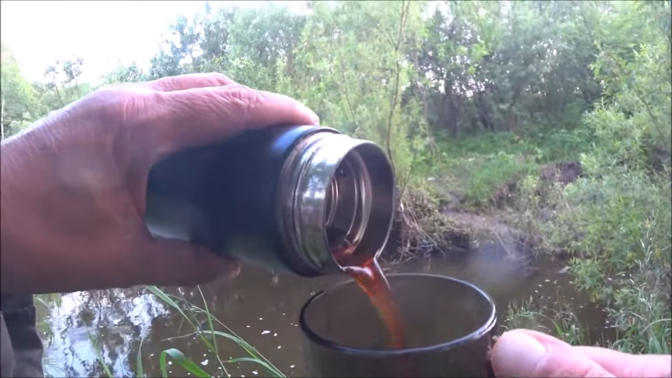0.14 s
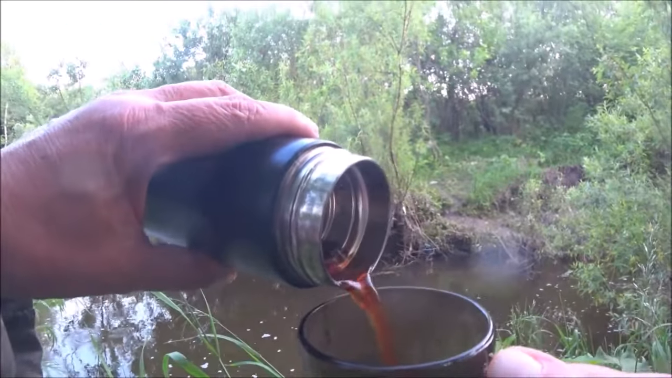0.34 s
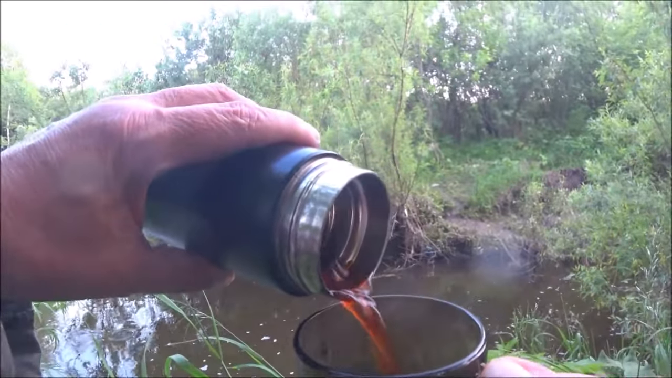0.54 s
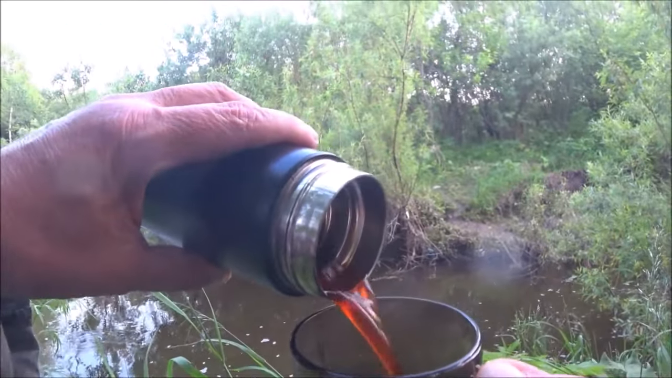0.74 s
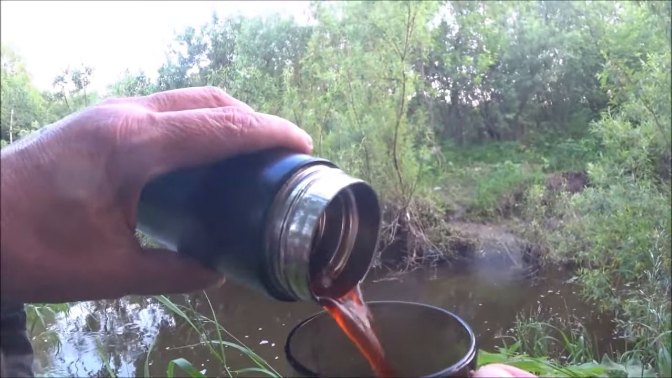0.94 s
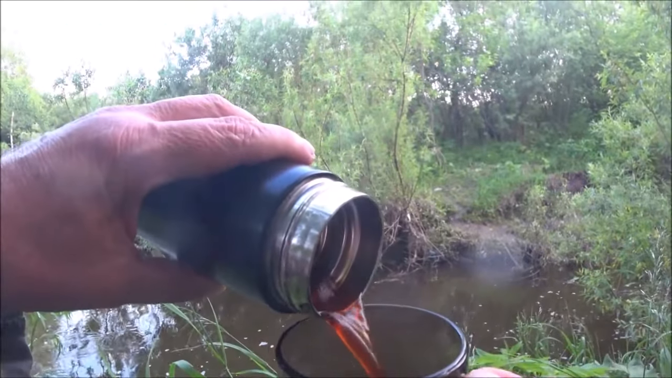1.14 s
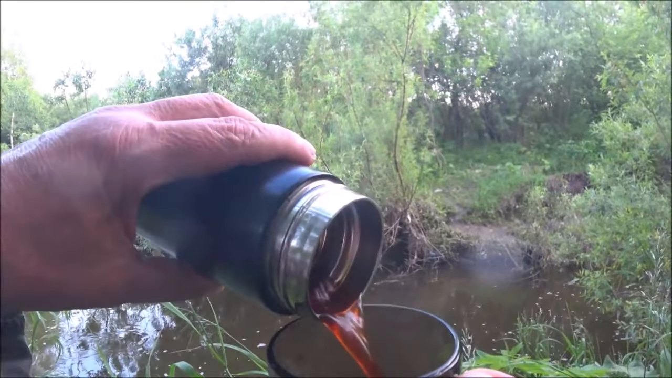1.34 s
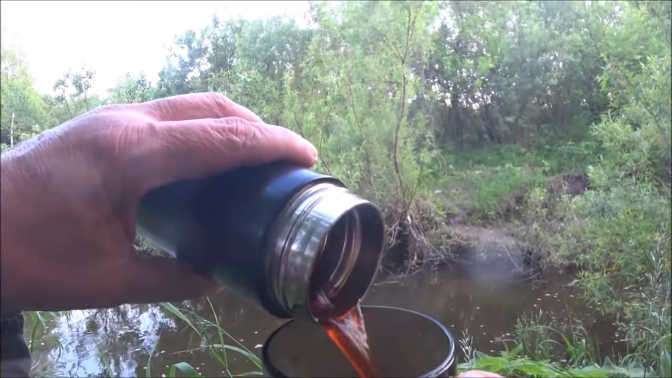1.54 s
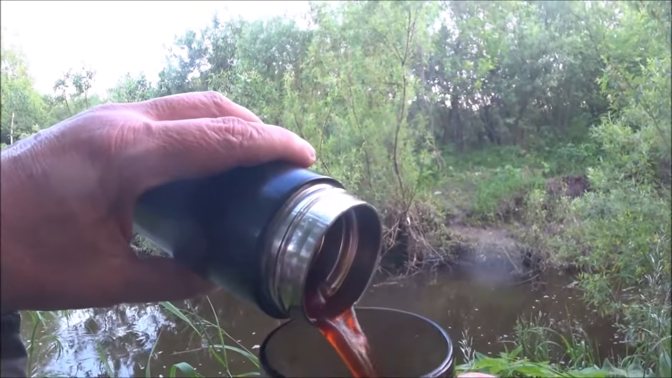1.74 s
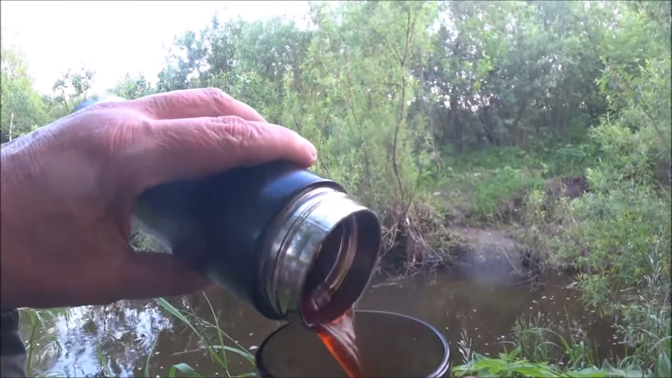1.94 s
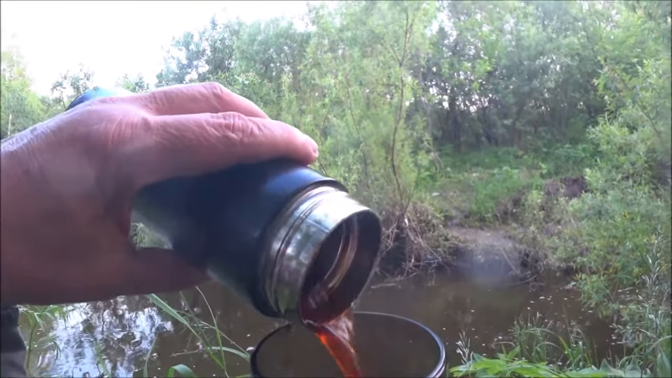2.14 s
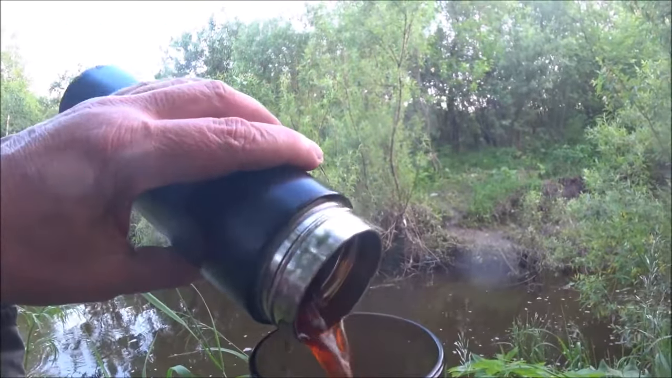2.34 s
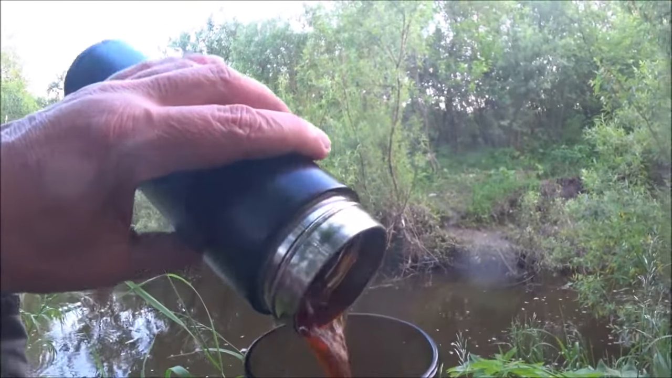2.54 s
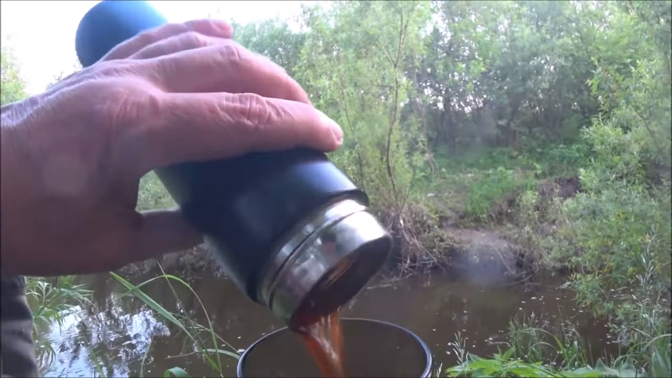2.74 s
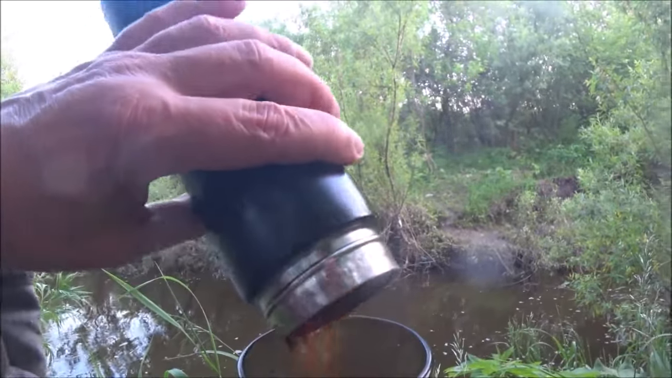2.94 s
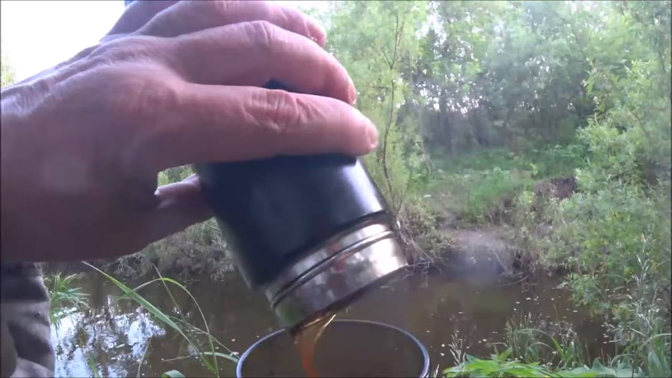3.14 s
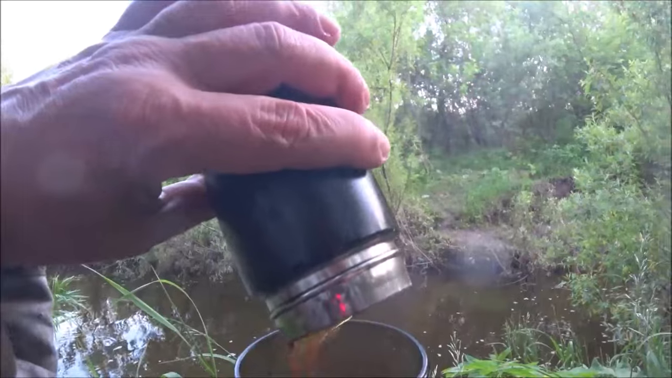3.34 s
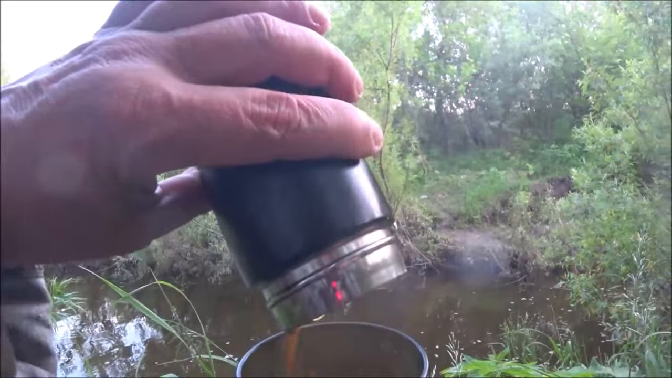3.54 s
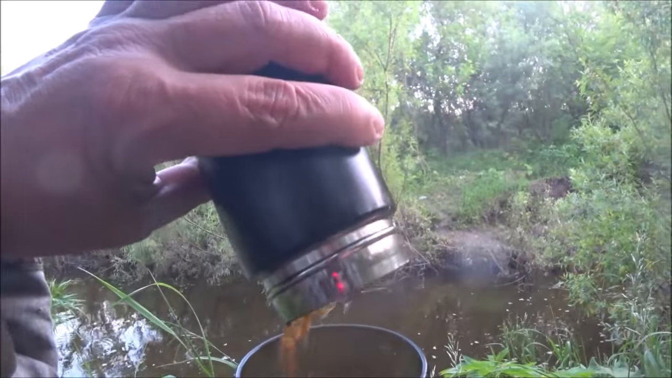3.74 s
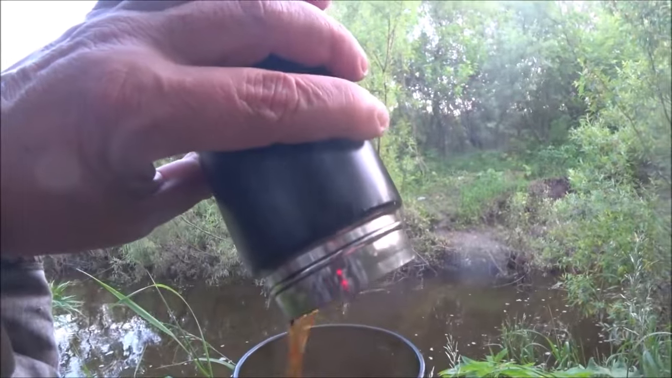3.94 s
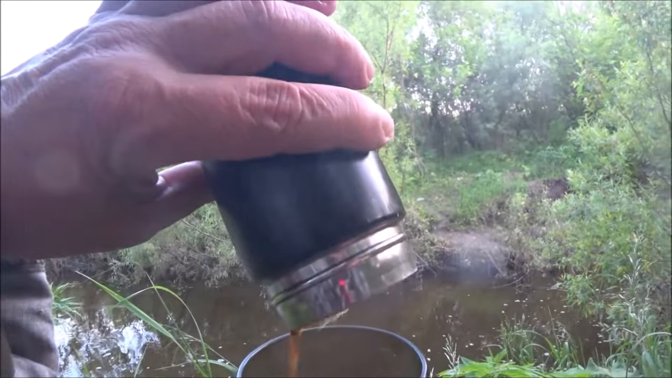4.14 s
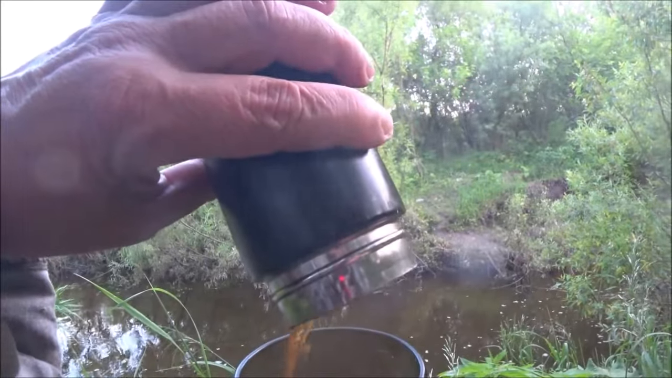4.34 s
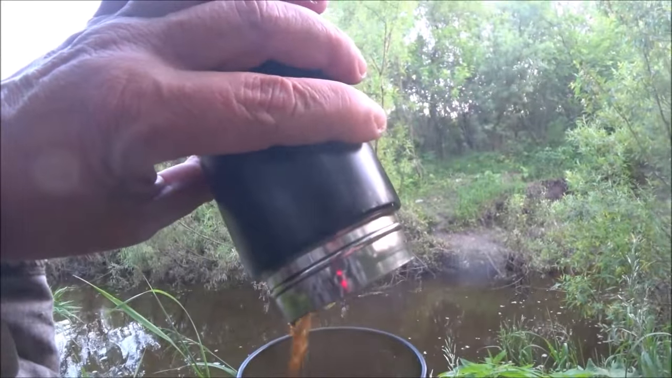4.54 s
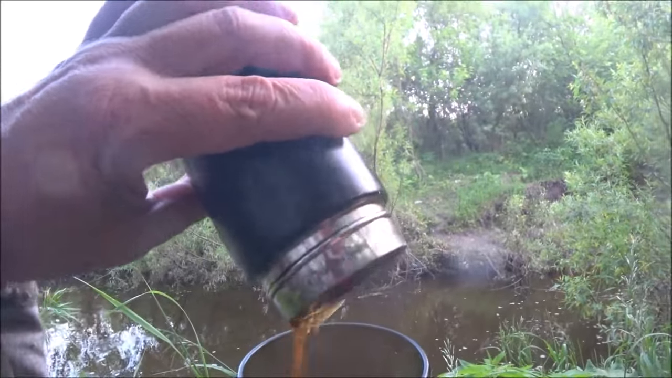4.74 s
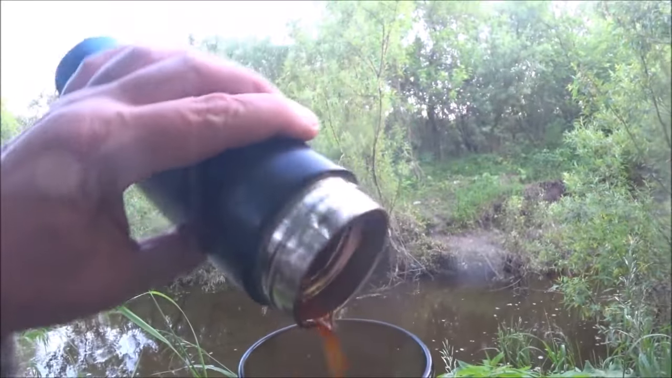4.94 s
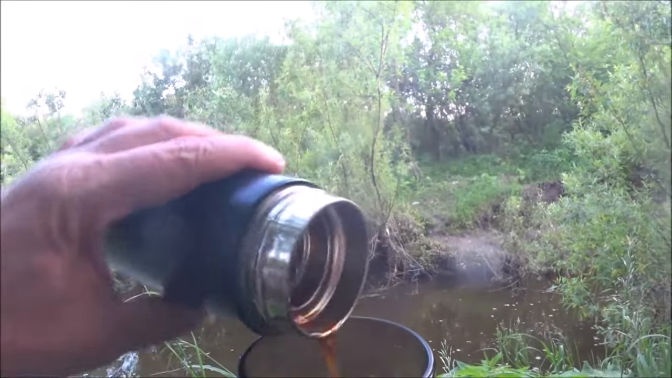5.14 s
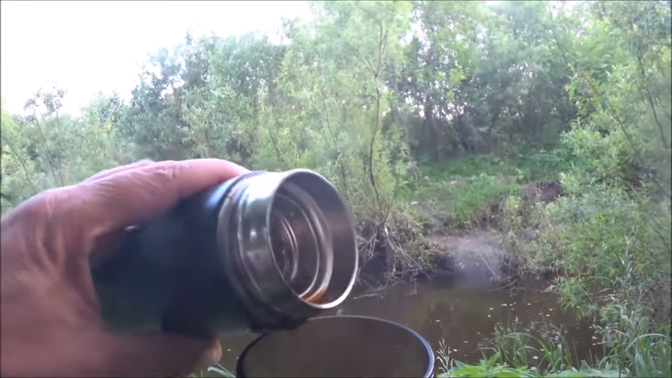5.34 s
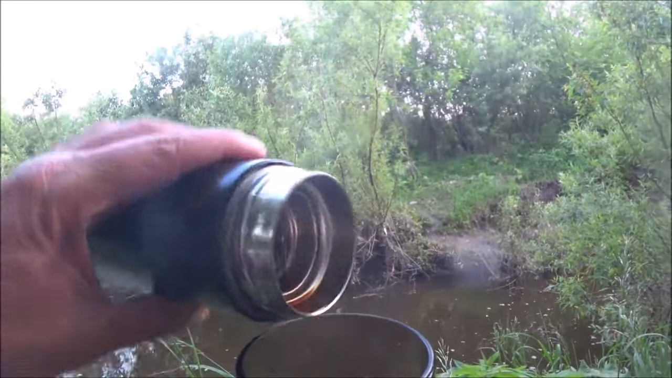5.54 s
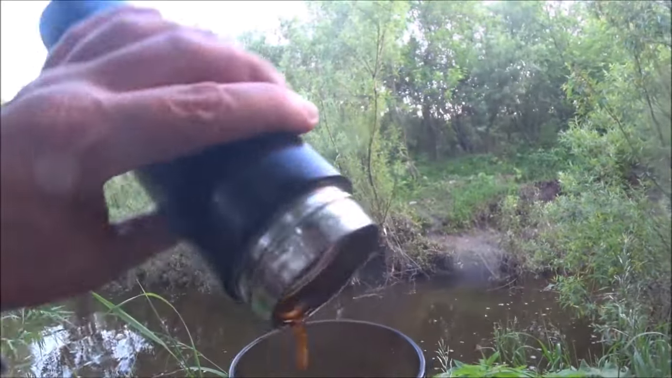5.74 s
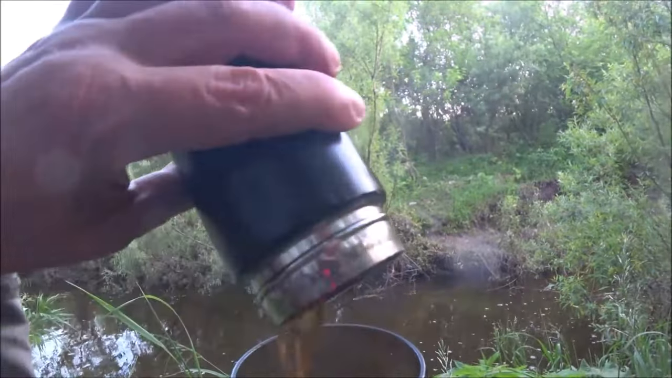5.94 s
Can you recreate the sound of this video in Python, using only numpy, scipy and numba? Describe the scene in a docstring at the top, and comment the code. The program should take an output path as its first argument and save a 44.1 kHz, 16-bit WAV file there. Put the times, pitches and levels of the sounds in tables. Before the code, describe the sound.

A thin trickle grows into bubbly, splattering pouring inside a small mug, stops with a light metal clink, then a few final drips fall.

```python
"""A hot drink is poured from a steel flask into a mug: the broken stream traps bubbles that plop,
ring the air in the mug and shake its wall. Droplets snap as noise cracks, a splash of random grains
runs between, and the thin opening stream is a lumpy wash of many small, mostly high bubbles. The flask
knocks the rim and bounces, ringing its modes; last drops follow. Behind lies the wide hush of a quiet
pond, banded stereo noise."""
import sys
import numpy as np
from scipy import signal
from scipy.io import wavfile
from scipy.ndimage import uniform_filter1d
from numba import njit

SR = 44100
rng = np.random.default_rng(int(sys.argv[2]) if len(sys.argv) > 2 else 0)


def ratio(d):
    """dB to gain"""
    e = np.asarray(d, float) / 20
    return 10 ** e


def to_wav(s):
    """Save 16-bit WAV."""
    ch = np.atleast_2d(s).T  # columns
    pcm = np.round(np.clip(ch, -1, 1) * 32767)  # PCM
    wavfile.write(sys.argv[1], SR, pcm.astype(np.int16))


N = 268382


def rms_one(x):
    """Scales to unit rms."""
    return x / np.sqrt(np.mean(x ** 2) + 1e-20)


def in_time(rows):
    """Interpolates the columns of a (time, values..) table at every sample."""
    s, *columns = np.transpose(rows)
    return [np.interp(np.arange(N) / SR, s, c) for c in columns]


def at_hz(points, hz):
    """Reads a spectrum on a log-frequency axis."""
    point_hz, value = np.transpose(points)
    return np.interp(np.log(hz), np.log(point_hz), value)


def add(out, s, grain):
    """Lays a grain into a track at time s."""
    at = round(s * SR)
    out[at:at + len(grain)] += grain[:max(N - at, 0)]


def ring(clicks, hz, t60_s):
    """A unit click sets a damped sine of height 1 ringing."""
    r = ratio(-60 / (t60_s * SR))
    w = 2 * np.pi * hz / SR
    return signal.lfilter([0, np.sin(w)], [1, -2 * r * np.cos(w), r * r], clicks + 1e-18)


def bubble(hz, t60_s, glide, rise_s):
    """A damped sine that starts at hz and slides by 2 * glide of it per t60."""
    t = np.arange(2600) / SR
    tone = np.sin(2 * np.pi * hz * t * (1 + glide * t / t60_s))
    return tone * (1 - np.exp(-t / rise_s)) * ratio(-60 * t / max(t60_s, 0.004))


@njit
def moving_resonance(x, hz, r):
    """Two-pole resonance whose centre (cycles a sample) moves."""
    y = np.zeros(len(x))
    for i in range(2, len(x)):
        drive = (1 - r * r) / 2 * (x[i] - x[i - 2])
        y[i] = drive + 2 * r * np.cos(2 * np.pi * hz[i]) * y[i - 1] - r * r * y[i - 2]
    return y


def resonance(x, hz, width_hz):
    """A resonance of fixed width that follows a pitch curve."""
    return moving_resonance(x, hz / SR, np.exp(-np.pi * width_hz / SR))


def grains(per_s, spread_db):
    """Random clicks of very uneven size and random sign."""
    sizes = ratio(spread_db * np.minimum(rng.exponential(1, N), 3)) * rng.choice([-1, 1], N)
    return sizes * (rng.random(N) < per_s / SR)


def drift(rate_hz):
    """Slow random curve of unit rms: noise through a double low-pass."""
    r = np.exp(-2 * np.pi * rate_hz / SR)
    return rms_one(signal.lfilter([1], [1, -2 * r, r * r], rng.standard_normal(N + SR))[SR:])


def bubbling(clicks, low_hz, high_hz, cycles, colour):
    """Deals clicks to resonators spread in log pitch, each ringing a set number of cycles."""
    pitches_hz = np.geomspace(low_hz, high_hz, num=14)
    dealt = rng.integers(0, len(pitches_hz), N)
    return rms_one(sum(ratio(at_hz(colour, hz)) * ring(clicks * (dealt == k), hz, cycles / hz)
                       for k, hz in enumerate(pitches_hz)))


def mug_modes():
    """As the mug fills, the shorter air column rings higher and the drink loads the wall to ring lower."""
    # low air mode, rises as the mug fills: time_s, pitch_hz
    low_air = [(0, 656), (1.0, 1016), (2.0, 1032), (3.0, 1330), (6.1, 1570)]
    # upper air mode, holds, wanders up a while, settles: time_s, pitch_hz
    upper_air = [(1.06, 3196), (1.24, 3280), (2.1, 3410), (2.33, 3770), (2.85, 3770), (3.02, 3520)]
    t = np.arange(N) / SR
    wall_hz = 2302 - 22.8 * t
    wall_db = -46 + 1.87 * t      # more wetted wall is shaken
    return in_time(low_air)[0], in_time(upper_air)[0], wall_hz, wall_db


def plops():
    """Each bubble is torn off with a tick, rings at its own pitch and kicks both air modes and the wall."""
    # trapped bubbles: start_s, level_db, pitch_hz
    trapped = [(0.5995, -17.5, 2020), (0.6996, -21.5, 2470), (1.0736, -25.5, 1063), (1.1028, -26, 1040),
               (1.1416, -33, 1030), (1.183, -32, 1045), (1.274, -25, 1140), (1.3595, -20, 1103),
               (1.377, -29, 1030), (1.4146, -24.5, 985), (1.4424, -23.5, 970), (1.4789, -25, 1030),
               (1.491, -23.5, 1024), (1.57, -29.5, 1160), (1.636, -24, 1124), (1.6587, -23, 1000),
               (1.6835, -25.5, 1020), (1.718, -30.5, 1030), (1.7689, -29, 1100), (1.8313, -22, 1070),
               (1.8823, -31.5, 915), (1.9198, -32.5, 900), (1.996, -33, 970), (2.071, -35, 800),
               (2.0932, -28.5, 830), (2.147, -29.5, 1710), (2.177, -29.5, 700), (2.2418, -20, 790),
               (2.3051, -23, 1187), (2.313, -25, 1130), (2.379, -30, 1300), (2.402, -31.5, 1280),
               (2.487, -29, 1150), (2.615, -26, 716), (2.641, -31.5, 697), (2.702, -31, 1280),
               (2.772, -33, 1320), (2.8087, -30.5, 1400), (2.871, -34.5, 1510), (2.908, -37.5, 1540),
               (3.017, -35.5, 1640), (3.082, -30.5, 990), (3.1215, -25.5, 1700), (3.1482, -23.5, 1495),
               (3.1925, -26.5, 1314), (3.4245, -27, 966), (3.467, -26, 910), (3.505, -16, 1370),
               (3.646, -23, 2110), (3.736, -28.5, 1210), (3.759, -26, 1320), (3.7942, -29, 937),
               (3.9454, -25, 1400), (3.9756, -17.5, 1376), (4.021, -20.5, 2070), (4.0673, -19.5, 1384),
               (4.128, -23, 965), (4.2073, -21.5, 1240), (4.2759, -25.5, 1040), (4.324, -26.5, 1255),
               (4.3834, -19.5, 1305), (4.4421, -30.5, 1350), (4.472, -27, 1400), (4.4798, -22.5, 1290),
               (4.515, -31, 1176), (4.5225, -28, 1165), (4.581, -23, 1830), (4.644, -19, 1330),
               (4.69, -22.5, 910), (4.8502, -13, 1140), (4.8896, -17, 1437), (4.929, -29, 1330),
               (4.957, -27, 1280), (5.0233, -32, 1360), (5.0825, -23, 1670), (5.91, -43, 2500),
               (5.926, -26, 2420), (5.9714, -23.5, 2950), (6.013, -34, 2400)]
    wall_width_hz = 19
    out, kicks = np.zeros(N), np.zeros(N)
    t = np.arange(200) / SR
    low_hz, upper_hz, wall_hz, wall_db = mug_modes()
    chance = rng.standard_normal((len(trapped), 3))
    noise = rng.standard_normal((len(trapped), len(t)))
    for (s, db, hz), (glide, detune, strength), hiss in zip(trapped, chance, noise):
        at = int(s * SR)
        reach = min(1, (low_hz[at] / hz) ** 3)      # bubbles above the mode hardly stir it and die faster
        t60_s = min(23.9 / hz, 0.021) * reach ** 0.15
        own = bubble(hz, t60_s, 0.015 + 0.055 * glide, rise_s=0.0015)
        low = bubble(low_hz[at] * (1.074 + 0.24 * detune), 0.0093, 0, rise_s=0.001)
        tick = hiss * ratio(-60 * t / 0.014)
        upper = bubble(upper_hz[at] * (1 + 0.02 * strength), 0.012, 0, rise_s=0.0003)
        add(out, s, ratio(db + 5.0) * own)
        add(out, s, ratio(db + 7.0 + 1.3 * strength) * reach * low)
        add(out, s, ratio(db - 16.5 - 2.67 * reach) * tick)
        add(out, s, ratio(db - 17 + 2.5 * glide) * upper)
        kicks[at] = ratio(0.63 * db + wall_db[at])      # big bubbles shake it less than in proportion
    wall = resonance(kicks, wall_hz, wall_width_hz)
    return out + wall * SR / (2 * np.pi * wall_width_hz)      # a unit kick rings at height 1


def snaps():
    """A droplet bursts: a short crack of noise ringing at its pitch, and a kick to the upper air mode."""
    # bursting droplets: start_s, upper_mode_db, crack_db, crack_hz
    bursts = [(0.6, -56, -28, 2950), (0.784, -33, -34.5, 7360), (0.8056, -25.5, -30.5, 4240),
              (0.83, -20.5, -44, 7360), (0.9102, -46, -25.5, 6130), (0.9168, -40, -28.5, 4080),
              (0.991, -26.5, -47, 9060), (1.1834, -21, -34, 7580), (1.4154, -36, -17.5, 9170),
              (1.4422, -28, -25.5, 7650), (1.46, -54, -32, 7100), (1.4794, -27, -27, 7800),
              (1.6133, -27.5, -24, 7840), (1.712, -37, -26, 7150), (2.1454, -32, -33.5, 10100),
              (2.3043, -59, -28.5, 7140), (2.9876, -32, -29.5, 4070), (3.056, -40, -26.5, 10900),
              (3.081, -35, -27.5, 10550), (3.12, -32.5, -28.5, 5300), (3.1957, -15, -27.5, 5300),
              (3.4245, -33, -29, 5640), (3.4394, -26, -26.5, 5760), (3.7933, -28, -32.5, 4930),
              (3.843, -25, -33.5, 9750), (3.934, -21.5, -34, 4800), (4.3823, -28.5, -18, 8900),
              (4.4702, -60, -31.5, 8900), (4.5141, -48, -34, 5660), (4.6907, -23, -20, 8900),
              (4.8497, -27, -29.5, 4970), (4.8893, -26, -27, 5970), (5.0222, -63, -20, 9000),
              (5.0823, -35, -27, 9200), (5.472, -47, -51, 3060), (5.889, -51, -42.5, 5800),
              (5.9758, -37.5, -34.5, 6800), (6.045, -52, -46, 6640)]
    out, t = np.zeros(N), np.arange(900) / SR
    upper_hz = mug_modes()[1]
    noise = rng.standard_normal((len(bursts), len(t)))
    for (s, upper_db, crack_db, hz), hiss in zip(bursts, noise):
        burst = hiss * (1 - np.exp(-t / 0.00048)) ** 2 * ratio(-60 * t / 0.0076)
        bright = np.diff(np.diff(burst, prepend=0), prepend=0)
        crack = rms_one(bright) + 1.06 * rms_one(ring(burst, hz, 0.0022))
        upper = bubble(upper_hz[int(s * SR)] * (1 + 0.015 * hiss[0]), 0.014, 0, rise_s=0.0004)
        add(out, s, ratio(crack_db + 6.5) * crack / abs(crack).max())
        add(out, s, ratio(upper_db) * upper)
    return out


def splash():
    """Small bubbles come in clumps and sound through the mug's air modes; finer ones fizz above in ticks."""
    # how hard the broken stream splashes: time_s, level_db
    stream = [(0, -67.5), (1.0, -54), (1.5, -54), (1.9, -55), (2.65, -59), (3.2, -54.5), (3.35, -51),
              (3.8, -48), (4.1, -50.5), (5.2, -48), (5.3, -94), (5.86, -100), (5.88, -53), (6.09, -58)]
    # small bubbles re spray: few in a shallow drink, more once it is deep; the last drops trap few
    shallow_db, deep_db, deep_at_s, pour_ends_s = -20, 1, 1.54, 5.3
    # small bubbles a second, fewer once the upended flask only dribbles
    upended_s, stream_per_s, dribble_per_s = 3.3, 170, 55
    # upper mode re spray: weakens as the air column shortens, stirred fully only once the stream broke up
    upper_start_db, upper_fades_db_per_s, upper_wakes_s = 9, 5.5, 1.29
    t = np.arange(N) / SR
    low_hz, upper_hz = mug_modes()[:2]
    spray_db = in_time(stream)[0]
    low_db = spray_db + np.interp(t, [0, deep_at_s, pour_ends_s, N / SR],
                                  [shallow_db, deep_db, deep_db, shallow_db])

    low_hz = low_hz * (1 + 0.1 * drift(25))      # bubble pitches wander
    per_s = np.where(t < upended_s, stream_per_s, dribble_per_s)
    small = grains(per_s * ratio(3.0 * drift(12)), spread_db=3.8)
    soft = signal.lfilter([1], [1, -1.6, 0.64], small)      # a bubble is born softly
    size = rng.choice(3, N, p=[0.25, 0.5, 0.25])
    low = np.zeros(N)
    for k, (share, width_hz, db) in enumerate([(0.64, 116, 1.6), (1, 139, 5.6), (1.35, 218, 11)]):
        broad = resonance(soft * (size == k), share * low_hz, 640)
        low += ratio(db) * resonance(broad, share * low_hz, width_hz)

    # each bubble throws a spurt of spray
    ticks = rms_one(signal.lfilter([1], [1, -1.968, 0.9682], abs(small))) + 0.1
    upper = resonance(small + grains(300 * ticks, spread_db=4.5), upper_hz, 800)
    upper = resonance(upper, upper_hz * (1 + 0.014 * t * drift(45)), 200)
    upper_gain = ratio(upper_start_db - upper_fades_db_per_s * t) * np.minimum(1, t / upper_wakes_s) ** 4
    fizz_clicks = ticks * grains(4000 * ticks, spread_db=4.0)
    fizz = bubbling(fizz_clicks, 4900, 11000, 12.0, [(4900, 0), (11000, 0)])
    return ratio(low_db) * rms_one(low) + ratio(spray_db) * (upper_gain * rms_one(upper) + ratio(-1.5) * fizz)


def opening_wash():
    """A lumpy wash of many small, mostly high bubbles, back at the last drops, and big soft glugs."""
    # the thin opening stream, its surge, and the splash of the last drops:
    # peak_s, level_db, swell_db_per_s, fade_db_per_s
    runs = [(0.21, -51.5, 26, 41), (0.43, -54, 163, 106), (5.972, -54, 209, 182)]
    # big soft bubbles in the nearly empty mug: start_s, level_db, pitch_hz
    glugs = [(0.055, -47, 484), (0.222, -41.5, 563), (0.243, -40.5, 818), (0.281, -44, 792),
             (0.372, -44, 752)]
    t = np.arange(N) / SR
    clicks = grains(2600 * ratio(5.0 * drift(18)), spread_db=3.6)
    level = sum(ratio(db - np.where(t < s, swell * (s - t), fade * (t - s))) for s, db, swell, fade in runs)
    out = np.zeros(N)
    for (s, db, hz), glide in zip(glugs, rng.standard_normal(len(glugs))):
        add(out, s, ratio(db + 7.5) * bubble(hz, 0.039, 0.14 * glide, rise_s=0.0021))
        # a softer one of nearby pitch goes ahead
        add(out, s - 0.018, ratio(db) * bubble(hz * (1 + 0.14 * glide), 0.057, 0, rise_s=0.0026))
    colour = [(400, -17), (750, 4), (1300, 4.5), (2600, 13.0), (6500, 13.5)]      # pitch_hz, level_db
    return out + level * bubbling(clicks, 423, 5860, 21.0, colour)


def knock():
    """The flask touches the rim and bounces twice; each touch strikes the modes anew and rattles the dregs."""
    # flask on the rim: start_s, level_db
    touches = [(5.269, -23), (5.292, -34), (5.313, -31)]
    # flask modes: pitch_hz, level_db, t60_s
    modes = [(279.7, -19.5, 0.42), (615, -3.5, 0.011), (1150, -19, 0.087), (1394, -2.5, 0.022),
             (2420, -10, 0.051), (2550, -22, 0.25), (2970, -21.5, 0.29), (4190, -8.5, 0.041),
             (5300, -12.5, 0.03)]
    out = np.zeros(N)
    touch_db = np.array(touches)[:, 1]
    at = [round(s * SR) for s, db in touches]
    for hz, level_db, t60_s in modes:
        clicks = np.zeros(N)
        clicks[at] = ratio(touch_db + level_db + rng.normal(0, 1.5, len(at)))
        out += ring(clicks, hz, t60_s)
    t = np.arange(4000) / SR
    decay = ratio(-60 * t / 0.012) + ratio(10.0 - 60 * t / 0.062)
    for s, db in touches:
        rattle = signal.lfilter([0.4, -0.8, 0.4], [1, -1.55, 0.57], rng.standard_normal(len(t)))
        add(out, s, ratio(db - 11.0) * rattle * decay)
    return out


def nearby_echoes(x):
    """Hand and ground send back short reflections, different at each ear."""
    out = np.zeros((2, N))
    for ear, (lag_s, db) in enumerate([(0.0009, -24.5), (0.0014, -10.5)]):
        lag = round(lag_s * SR)
        out[ear, lag:] += ratio(db) * np.diff(x[:-lag], prepend=0)      # small things reflect the treble best
    return out


def hush():
    """Far leaves, water and air: half-octave bands of stereo noise, each with its own level and likeness."""
    # relative spectrum of the outdoors: pitch_hz, level_db_per_hz
    spectrum = [(25, -3.5), (150, -10), (300, -7.5), (700, -12), (1500, -13), (3000, -19.5), (11000, -29)]
    # left-right correlation: pitch_hz, likeness (-1 to 1)
    likeness = [(30, 1), (80, 0.79), (200, 0.19), (1400, -0.57), (7000, -0.31)]
    out = 0
    edges_hz = 18 * 2 ** np.arange(0, 9.6, 0.5)
    white = rng.standard_normal((2, 2, N))      # neighbouring bands get unrelated noise
    for k, (low, high) in enumerate(zip(edges_hz, edges_hz[1:])):
        band = signal.butter(2, [low, high], "band", fs=SR, output="sos")
        mid, side = signal.sosfilt(band, white[k % 2])
        hz = np.sqrt(low * high)
        alike = np.clip(at_hz(likeness, hz), -1, 1)
        stereo = np.sqrt(1 + alike) * mid + np.sqrt(1 - alike) * side * [[1], [-1]]
        out = out + ratio(at_hz(spectrum, hz)) * stereo
    return ratio(-54.5) * rms_one(out)


def scene():
    """The mug is too small to send out lows; it sits a little left, the opening wash further left."""
    high_pass = signal.butter(2, 600, "high", fs=SR, output="sos")
    mug = signal.sosfilt(high_pass, plops() + snaps() + splash()) + knock()
    mug_pan = ratio(np.array([[0.9], [-0.9]]))
    wash_pan = ratio(np.array([[2.5], [-2.5]]))
    return mug * mug_pan + nearby_echoes(mug) + opening_wash() * wash_pan + hush()


def band_limit(x):
    """A steep low-pass at the top of the band."""
    return signal.sosfilt(signal.butter(12, 16510, fs=SR, output="sos"), x)


def record(dry):
    """The top is cut steeply and opens only while it is loud."""
    cut_hz = 10950
    cut = signal.sosfilt(signal.ellip(8, 0.5, 60, cut_hz, fs=SR, output="sos"), dry)
    top = signal.sosfilt(signal.butter(2, [cut_hz, 13000], "band", fs=SR, output="sos"), dry)
    power = uniform_filter1d(top ** 2, size=256)
    opened = top * power / (power + ratio(-56.0) ** 2)
    return band_limit(cut + ratio(-16.0) * opened)


dry = scene()
out = record(dry)
to_wav(out)
```